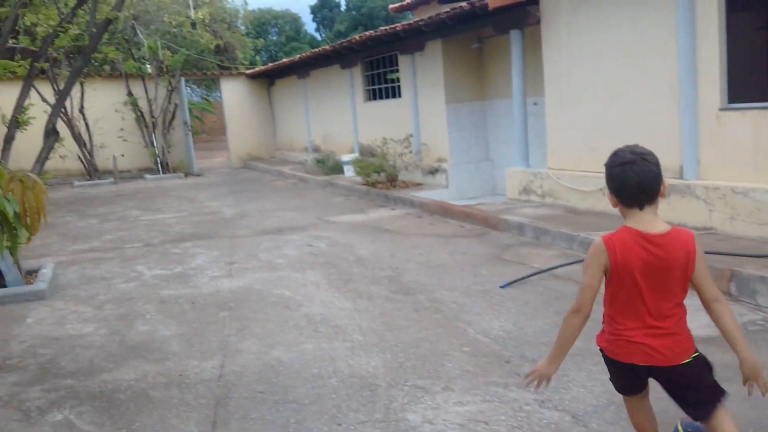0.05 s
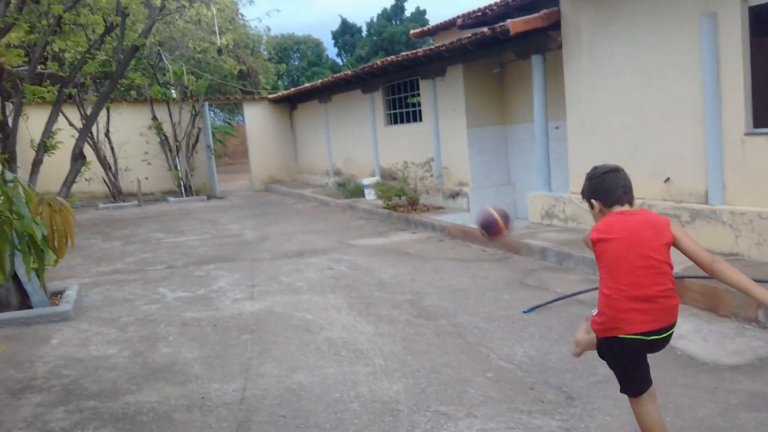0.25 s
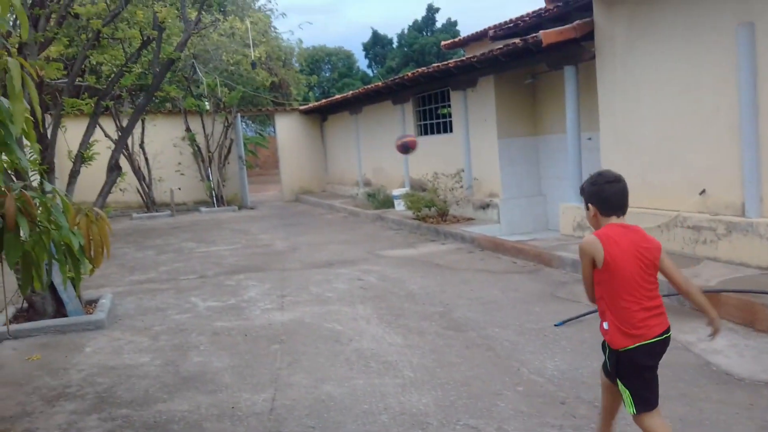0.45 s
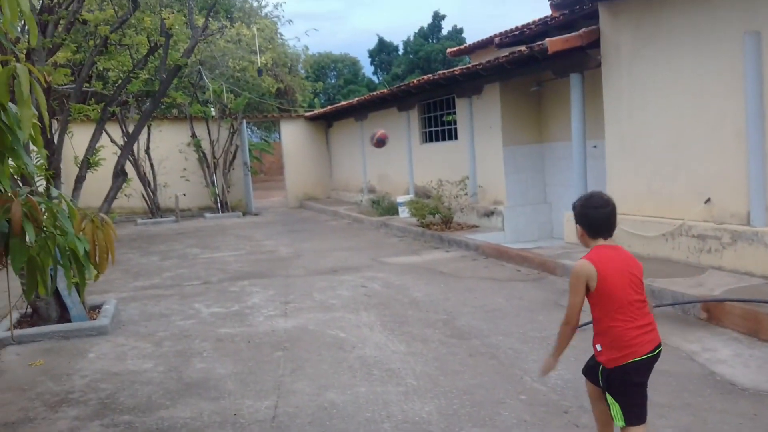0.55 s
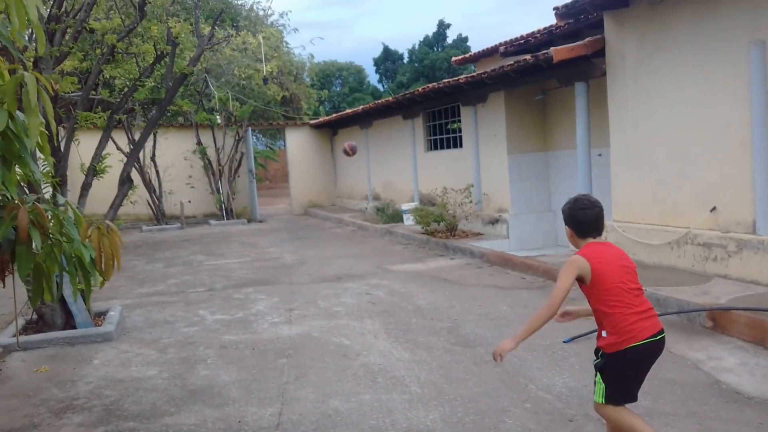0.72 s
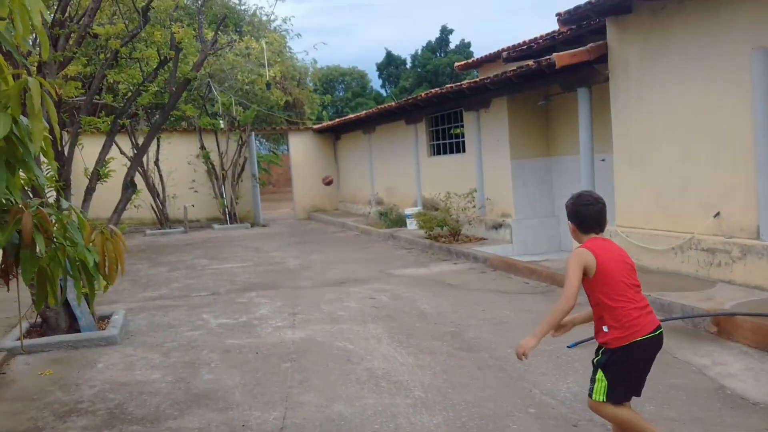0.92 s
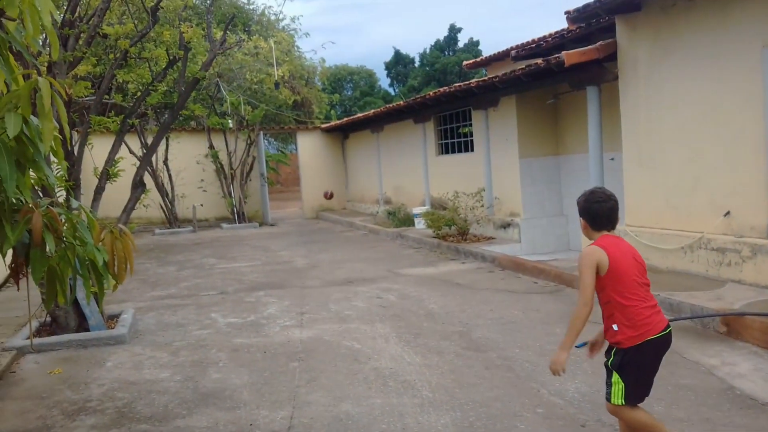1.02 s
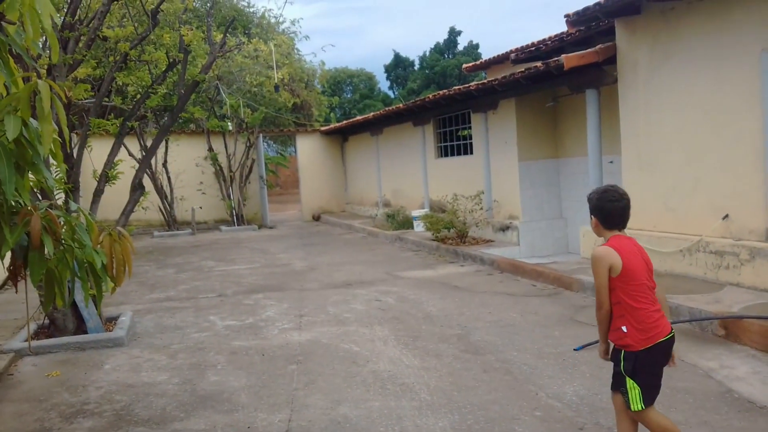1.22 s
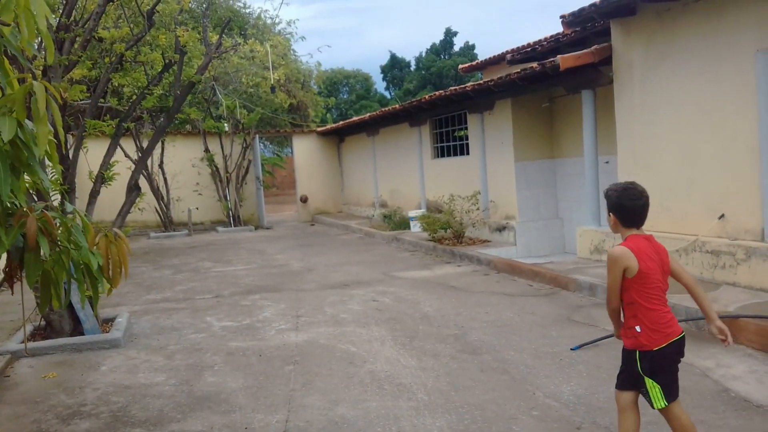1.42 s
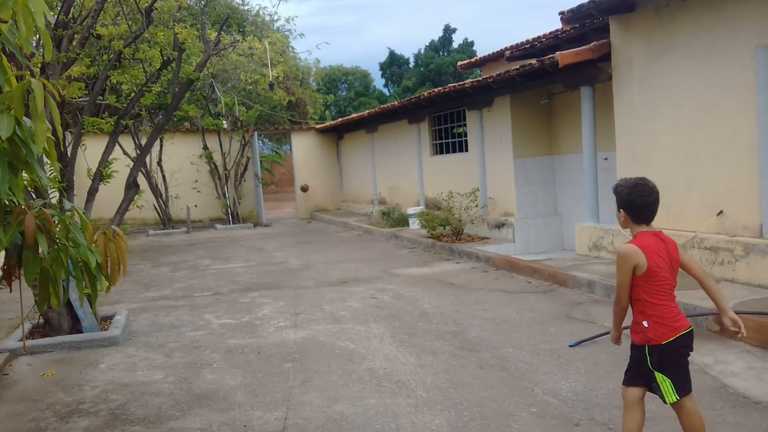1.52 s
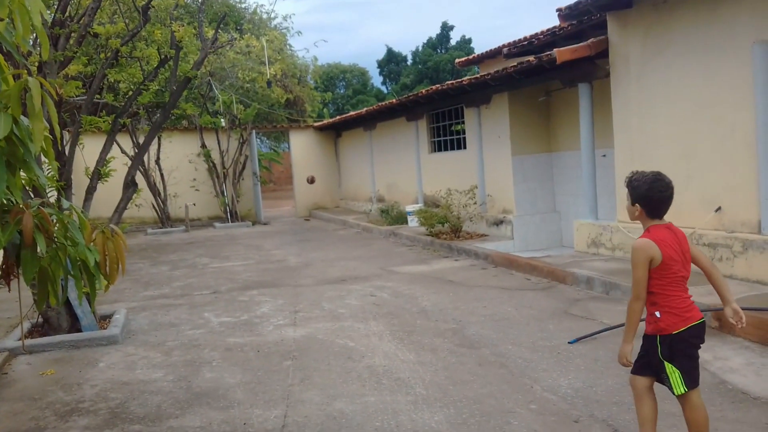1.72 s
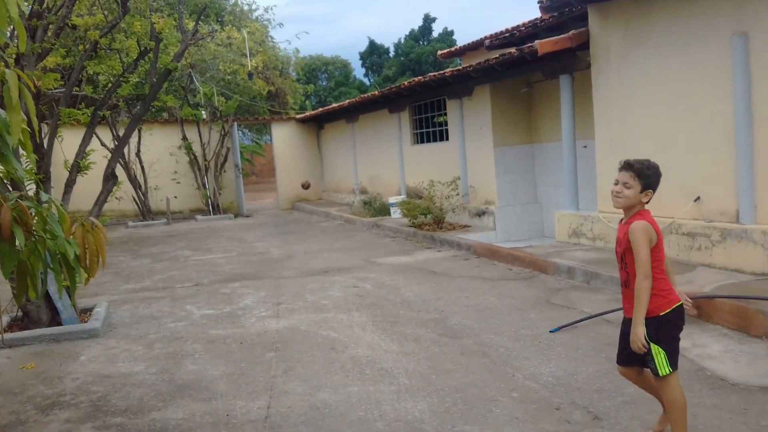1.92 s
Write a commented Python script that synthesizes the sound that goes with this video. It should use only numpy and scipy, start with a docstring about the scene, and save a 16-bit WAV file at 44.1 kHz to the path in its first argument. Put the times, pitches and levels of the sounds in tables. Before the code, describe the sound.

One loud, echoing kick of a ball outdoors, followed by two softer distant bounces.

```python
"""A ball kicked across a yard

A child steps up, clothes rustling, and kicks an inflated ball hard across a walled concrete yard.
The shoe makes a thump and a slap, the air in the ball pings, the house echoes and the porch booms.
The kicking foot lands. A second after the kick the ball scrapes and knocks the far wall, then bounces
on the ground. The air is still, with one faint distant bird."""
import sys
import numpy as np
from scipy import signal
from scipy.fft import rfft, irfft
from scipy.io import wavfile

SR = 44100
rng = np.random.default_rng(int(sys.argv[2]) if len(sys.argv) > 2 else 0)


def master(y):
    """Save y as 16-bit WAV."""
    cut = np.clip(np.atleast_2d(y).T, -1, 1)
    pcm = np.round(cut * 32767)  # scale
    wavfile.write(sys.argv[1], SR, pcm.astype(np.int16))


N = 85995
TIME = np.arange(N) / SR  # seconds
KICK_S = .2272

# The thump of shoe on ball. Each row: frequency in Hz, level in dB.
THUMP_TONE = [(30, -31), (100, -7.5), (180, -8.5), (330, 0.5), (700, -11.5), (950, -14), (1200, -5.5),
              (1600, -23.5), (2800, -20.5), (4200, -30.5), (5800, -54.5), (15000, -63)]
# The ball's skin slapping the shoe. Each row: frequency in Hz, level in dB.
SLAP_TONE = [(100, -24), (600, -3.5), (1200, -2.5), (1750, -9), (2200, 0.5), (3000, -0.5), (4700, -9.5),
             (5600, -25.5), (15000, -30.5)]
# Echoes off the ground and house. Each row: delay in seconds, thump level in dB, slap level in dB.
HOUSE_ECHOES = [(.0027, -14.5, -14), (.0105, -10.5, -3), (.0135, -18.5, -12), (0.0215, -19, -14),
                (.040, -18.5, -9)]
# The wash of sound the yard sends back. Each row: frequency in Hz, level in dB.
KICK_WASH_TONE = [(25, -12), (50, -0.5), (80, 17), (160, 13), (260, 20), (480, 15.5), (750, 9.5), (1050, 4),
                  (1550, 8.5), (2000, 6), (2500, 7.5), (4000, -1), (5800, -16), (15000, -24.5)]
# Air ringing inside the ball. Each row: pitch in Hz, level in dB, seconds to fade by 60 dB.
BALL_PING = [(1162, -40.5, 0.074), (1250, -32.5, 0.12), (2145, -43, 0.5), (2174, -43.5, 0.51),
             (2460, -38.5, 0.34), (2537, -44, .5), (2766, -43, 0.18), (2864, -38, 0.24), (3200, -46, 0.28),
             (3930, -38.5, 0.11), (4814, -42, 0.071)]
# Sound trapped between the house walls and under the porch.
# Each row: pitch in Hz, level in dB, seconds to fade by 60 dB.
PORCH_BOOM = [(78.6, -37, 0.61), (88.17, -33, .85), (94.5, -36, 0.46), (108.3, -38.5, .7), (125, -43, 0.35),
              (251, -34.5, .52), (268, -36, 0.64), (306.4, -34, .55), (481, -39.5, .5), (575, -34, 0.43)]
def kick(porch_delay_s=.00902):
    """The shoe dents the ball: a thump and a slap echo, the air inside pings and the porch booms."""
    out = np.zeros(N)
    thump = -amp(26) * pulse(THUMP_TONE)
    slap = amp(-22) * burst(SLAP_TONE, hold_s=.0022, fade_s=.012)
    echoes = np.array(HOUSE_ECHOES)
    add(out, KICK_S, echoed(thump, echoes[:, [0, 1]]))
    add(out, KICK_S, echoed(slap, echoes[:, [0, 2]]))
    add(out, KICK_S, ring(BALL_PING))
    add(out, KICK_S, yard(pulse(KICK_WASH_TONE)))
    add(out, KICK_S + porch_delay_s, ring(PORCH_BOOM))
    return out


# The ball's thump on concrete. Each row: frequency in Hz, level in dB.
CONCRETE_TONE = [(30, -7.5), (100, 0.5), (220, 0), (430, 16), (660, -2), (860, -3), (1100, -15),
                 (2200, -26.5), (3100, -19), (5000, -37), (15000, -61)]
# Echoes at the far end of the yard. Each row: delay in seconds, level in dB.
FAR_END_ECHOES = [(.0080, 1), (0.0167, -19), (0.0234, -3), (.0455, -7), (0.0584, -10)]
# The wash of sound after a bounce. Each row: frequency in Hz, level in dB.
BOUNCE_WASH_TONE = [(30, -5), (80, 6), (170, 9.5), (300, 15), (480, 11.5), (700, 0.5), (900, -0.5),
                    (1500, -5), (3100, -7.5), (5500, -25.5), (15000, -41.5)]
def far_hit(notes, thump_db, wash_db):
    """The ball thumps and rings on distant concrete; some echoes are about as loud as the thump."""
    thump = -amp(thump_db) * pulse(CONCRETE_TONE)
    wash = amp(wash_db) * yard(pulse(BOUNCE_WASH_TONE))
    return echoed(thump, FAR_END_ECHOES) + ring(notes) + wash


# The ringing after the ball hits the wall, and after it hits the ground.
# Each row: pitch in Hz, level in dB, seconds to fade by 60 dB.
WALL_RING = [(171.4, -46, 0.61), (200.2, -47, 0.43), (464, -32, 0.07), (947, -38, .06), (2980, -36, 0.016)]
GROUND_RING = [(236.4, -39.5, 0.4), (455, -32.5, 0.14), (856.6, -38, 0.13), (1268, -47, 0.19),
               (2020, -49, 0.23), (2980, -40, 0.026), (3280, -36, 0.025)]
def bounces(wall_s=1.3535, ground_s=1.6025):
    """The ball knocks against the far wall, then drops to the ground."""
    out = np.zeros(N)
    add(out, wall_s, far_hit(WALL_RING, thump_db=-12, wash_db=-9))
    add(out, ground_s, far_hit(GROUND_RING, thump_db=-1.5, wash_db=-2))
    return out


# The ball rubbing on the wall. Each row: frequency in Hz, level in dB.
SCRAPE_TONE = [(40, -1), (150, -12), (400, 4.5), (650, -6.5), (950, -1), (1400, -10.5), (3000, -8.5),
               (4500, -18), (7000, -25.5), (15000, -34)]
def scrape(start_s=1.3335):
    """A short gritty rub that dies away as the ball reaches the far wall."""
    out = np.zeros(N)
    add(out, start_s, amp(-45.5) * burst(SCRAPE_TONE, hold_s=.018, fade_s=.39))
    return out


# Shoes meeting the ground. Each row: start in seconds, thud level in dB, sole slap level in dB.
FOOTFALLS = [(.1150, 5, -43), (.1218, -1.5, -36), (0.5821, -22, -19)]
# The foot's dull thud and the sole's bright slap. Each row: frequency in Hz, level in dB.
THUD_TONE = [(30, -27.5), (130, -9), (320, 1.5), (480, -6), (700, -18.5), (2000, -49), (15000, -72.5)]
SOLE_TONE = [(50, -4), (500, 3), (1300, 1), (2300, -6), (3800, -3.5), (5000, -30.5), (15000, -33.5)]
def footsteps(wash_db=-9):
    """Heel and toe come down before the kick; the kicking foot lands after it."""
    out = np.zeros(N)
    for start_s, thud_db, slap_db in FOOTFALLS:
        add(out, start_s, amp(thud_db) * pulse(THUD_TONE) + amp(slap_db) * pulse(SOLE_TONE))
    return out + amp(wash_db) * yard(out)


# Rustling clothes. Each row: frequency in Hz, level in dB.
CLOTH_TONE = [(60, -12), (400, 0.5), (900, -2), (1600, 4), (2500, -4), (4000, -18), (15000, -31.5)]
def clothes(rise_s=.14):
    """Cloth rustles as the leg swings, growing louder until the foot meets the ball."""
    until_kick = KICK_S - TIME
    swell = np.exp(-abs(until_kick) / rise_s) * (until_kick > 0)
    return amp(-64) * noise(CLOTH_TONE) * swell


# Points along the bird's one note. Each row: time in seconds, pitch in Hz, level in dB.
BIRD_NOTE = [(.73, 4197, -87), (.775, 4023, -67.5), (.80, 3100, -68), (.85, 2630, -72), (.88, 2630, -85)]
def bird(rasp_width_hz=630, wash_db=-3):
    """A faint falling whistle from the trees, made hoarse by multiplying it with noise."""
    times, hz, db = np.transpose(BIRD_NOTE)
    smoothing = signal.butter(2, rasp_width_hz / 2, fs=SR, output="sos")
    rasp = unit(signal.sosfilt(smoothing, rng.standard_normal(N)))
    whistle = np.sin(2 * np.pi * np.cumsum(np.interp(TIME, times, hz)) / SR)
    loudness = amp(np.interp(TIME, times, db)) * (TIME > times[0]) * (TIME < times[-1])
    note = rasp * whistle * loudness
    return note + amp(wash_db) * yard(note)


# How long sound lingers in the yard. Each row: frequency in Hz, seconds to fade by 60 dB.
YARD_FADE = [(60, 1), (250, 0.69), (600, 0.65), (1500, 0.67), (3000, 0.6), (5500, .5), (11000, 0.5)]
def yard(sound, echoes_per_s=5000, clump_db=1.77, clump_s=.012, delay_s=.0025, build_s=.0067):
    """Many tiny echoes off the walls arrive in clumps and blur into a wash; the highs die first."""
    echoes = rng.choice([-1., 1.], N) * (rng.random(N) < echoes_per_s / SR)
    clumps = amp(clump_db * np.interp(TIME / clump_s, np.arange(N), rng.standard_normal(N)))
    hz, times, bands = signal.stft(echoes * clumps, SR, nperseg=512)
    bands *= fade(times, read(YARD_FADE, hz)[:, None])
    wash = signal.istft(bands, SR, nperseg=512)[1][:N]
    wash *= np.clip((TIME - delay_s) / build_s, 0, 1)
    return signal.fftconvolve(sound, wash / np.linalg.norm(wash))[:N]


# The outdoor hush. Each row: frequency in Hz, level in dB.
AIR_TONE = [(20, 6.5), (55, -2.5), (129, 0.5), (193, -4), (410, -1.5), (895, -7), (1340, -8.5), (3170, -11),
            (7300, -22), (15500, -23.5)]
def still_air():
    """A very quiet, steady hush behind everything."""
    return amp(-70) * noise(AIR_TONE)


def amp(db):
    """Turns decibels into a number to multiply by."""
    return 10 ** (np.asarray(db) / 20)


def unit(sound):
    """Scales a sound to an average (rms) level of one."""
    return sound / np.sqrt(np.mean(sound ** 2) + 1e-20)


def fade(seconds, fade_s):
    """A level that falls by 60 dB every fade_s seconds."""
    return np.exp(-np.log(1000) * seconds / fade_s)


def read(table, hz):
    """Reads between a table's rows, with frequency spaced by octaves."""
    row_hz, values = np.transpose(table)
    return np.interp(np.log(hz + 1), np.log(row_hz + 1), values)


def add(mix, start_s, sound):
    """Mixes a sound in at the given time."""
    part = mix[max(round(start_s * SR), 0):][:len(sound)]
    part += sound[:len(part)]


def pulse(tone, size=8192):
    """One sudden push of air with the given tone."""
    hz = abs(np.fft.fftfreq(size, 1 / SR))
    log_gain = np.log(amp(read(tone, hz)))
    spectrum = np.exp(np.conj(signal.hilbert(log_gain)))  # packs the energy at the start
    return np.fft.ifft(spectrum).real[:size // 2]


def noise(tone):
    """Steady noise at level one; the table sets only the balance of lows and highs."""
    gains = amp(read(tone, np.fft.rfftfreq(N, 1 / SR)))
    return unit(irfft(rfft(rng.standard_normal(N)) * gains, N))


def burst(tone, hold_s, fade_s):
    """Noise that starts at once, holds, and dies away."""
    return noise(tone) * fade(np.maximum(TIME - hold_s, 0), fade_s)


def ring(notes, rise_s=.0008):
    """Pure notes that start smoothly together and each die away."""
    ringing = sum(amp(db) * fade(TIME, fade_s) * np.sin(2 * np.pi * hz * TIME)
                  for hz, db, fade_s in notes)
    return ringing * (1 - np.exp(-(TIME / rise_s) ** 2))


def echoed(sound, echoes):
    """A sound followed by its separate echoes."""
    out = np.zeros(N)
    add(out, 0, sound)
    for delay_s, db in echoes:
        add(out, delay_s, amp(db) * sound)
    return out


def scene():
    """All the sounds together, the same on the left and right."""
    mono = kick() + bounces() + scrape() + footsteps() + clothes() + bird() + still_air()
    return np.array([mono, mono])


def record(dry, low_cut_hz=45, whine_hz=7510, high_cut_hz=15900):
    """Cuts the rumble, adds a faint whine and hiss, then trims the very highest sounds."""
    low_cut = signal.butter(2, low_cut_hz, "high", fs=SR, output="sos")
    high_cut = signal.firwin(511, high_cut_hz, window=("kaiser", 9), fs=SR)
    whine = amp(-89) * unit(np.sin(2 * np.pi * whine_hz * TIME))
    hiss = amp(-73) * rng.standard_normal((2, N))
    mix = signal.sosfilt(low_cut, dry) + whine + hiss
    return signal.oaconvolve(mix, high_cut[None], "same")


dry = scene()
out = record(dry)
master(out)
```